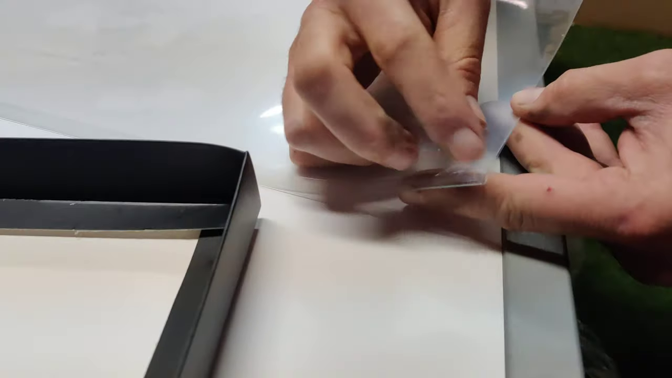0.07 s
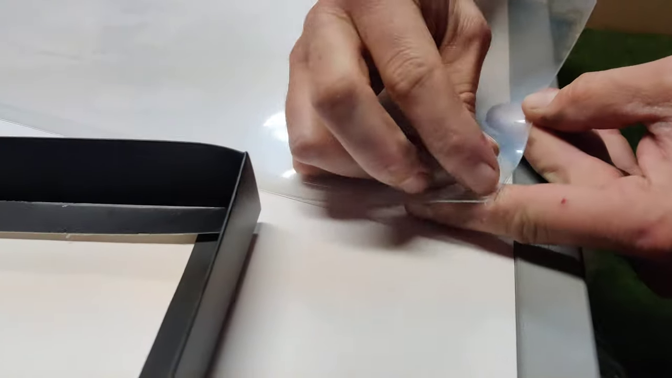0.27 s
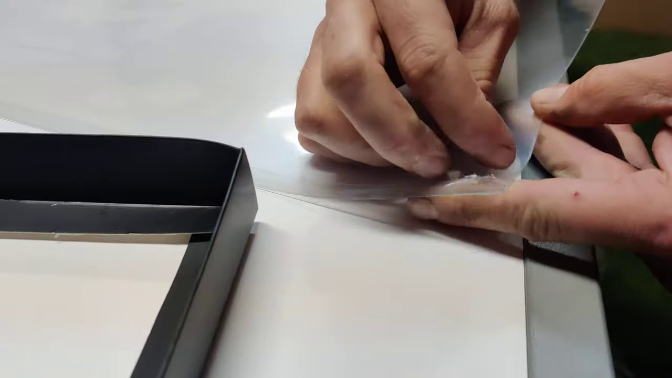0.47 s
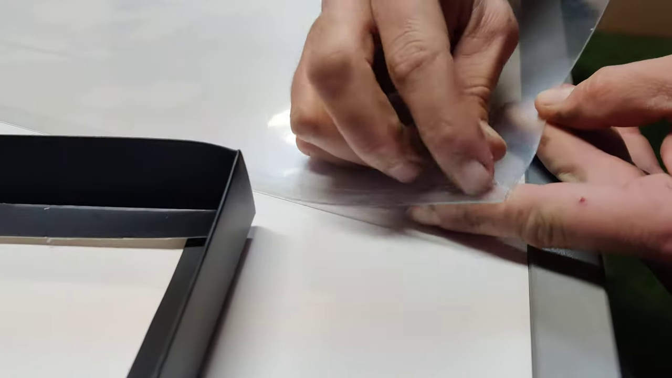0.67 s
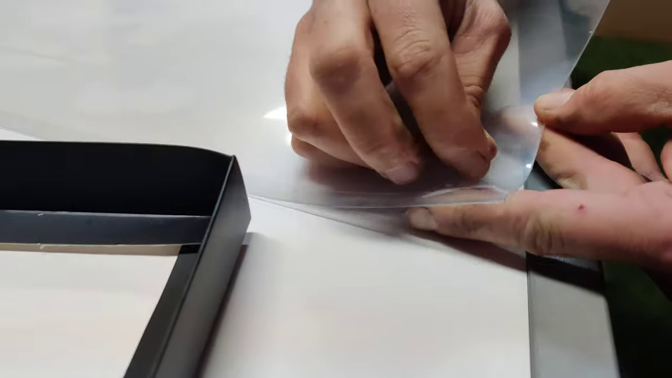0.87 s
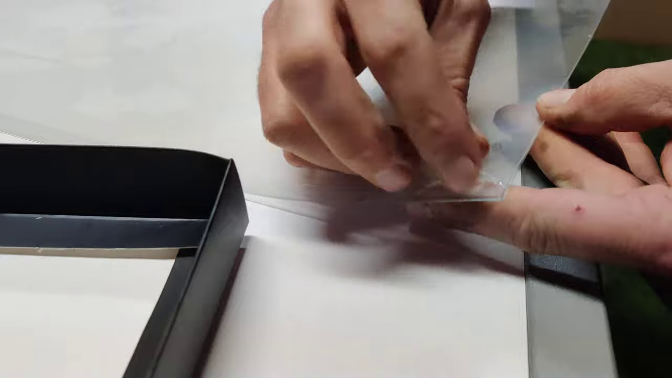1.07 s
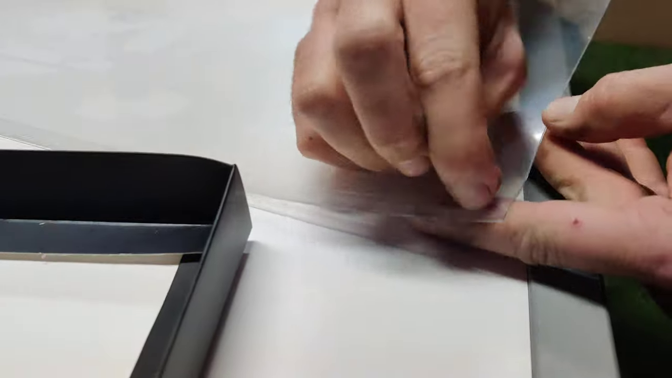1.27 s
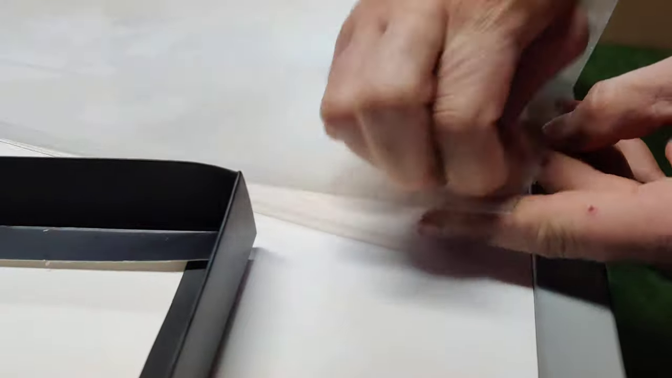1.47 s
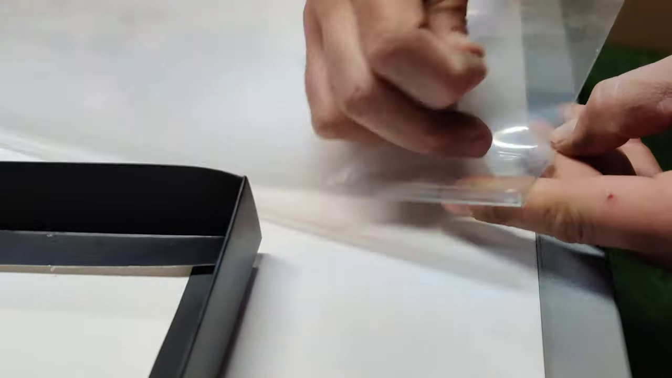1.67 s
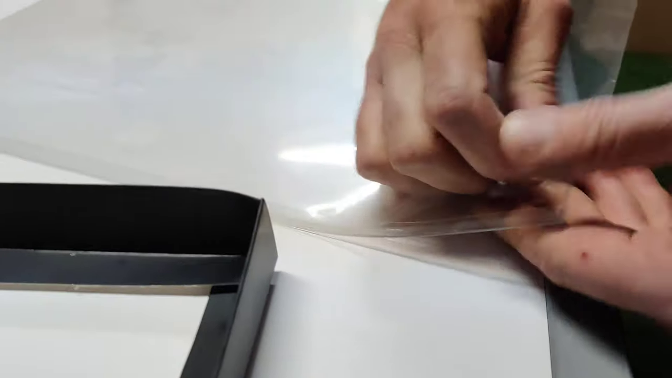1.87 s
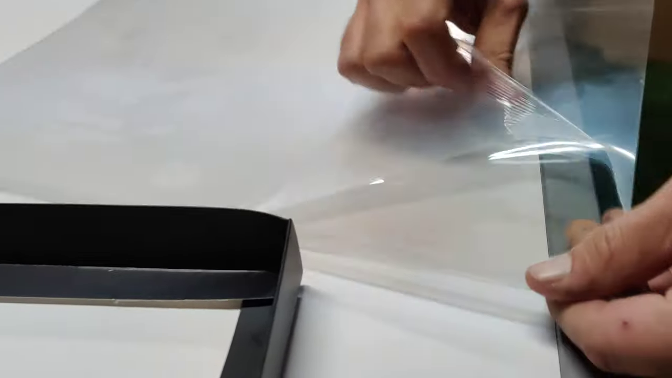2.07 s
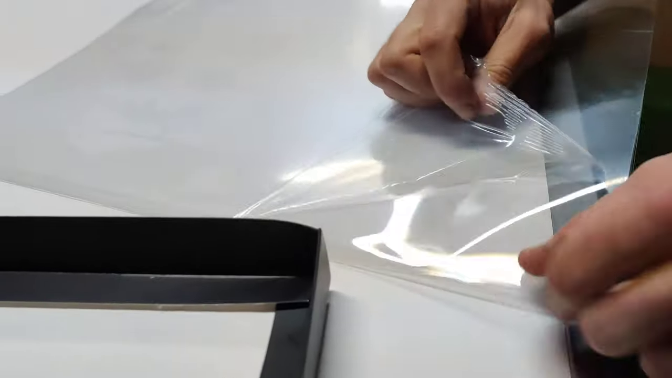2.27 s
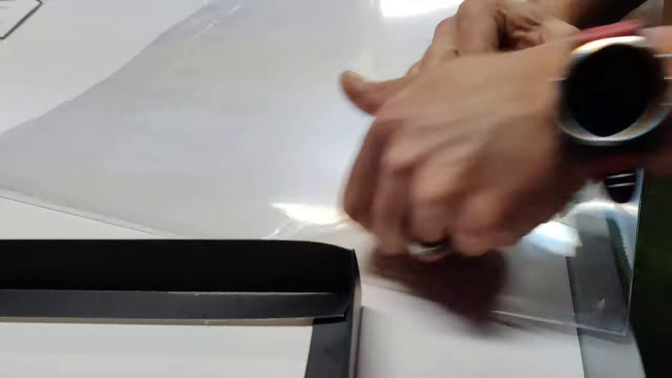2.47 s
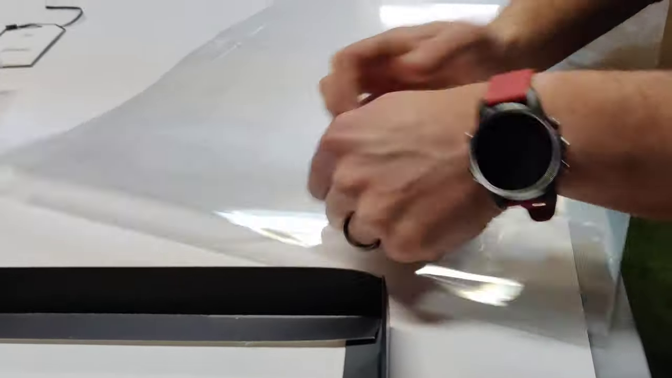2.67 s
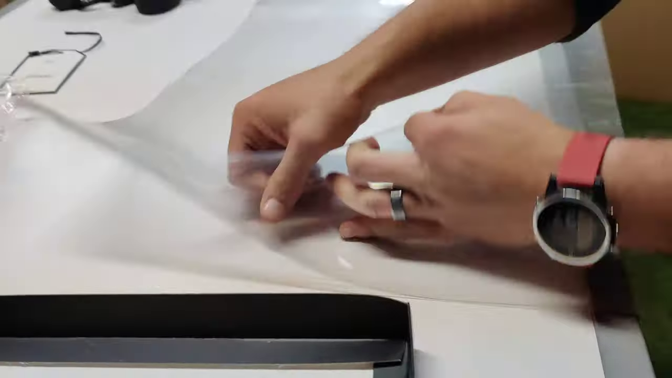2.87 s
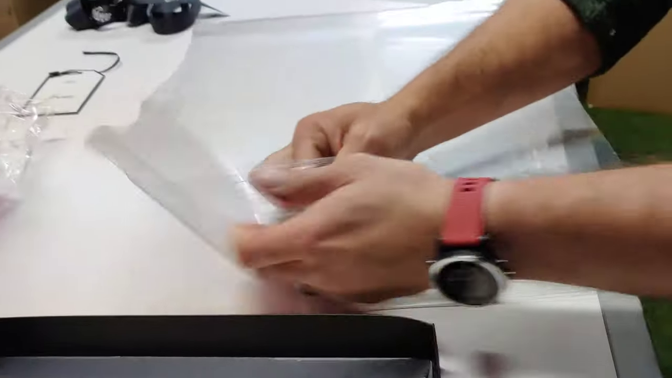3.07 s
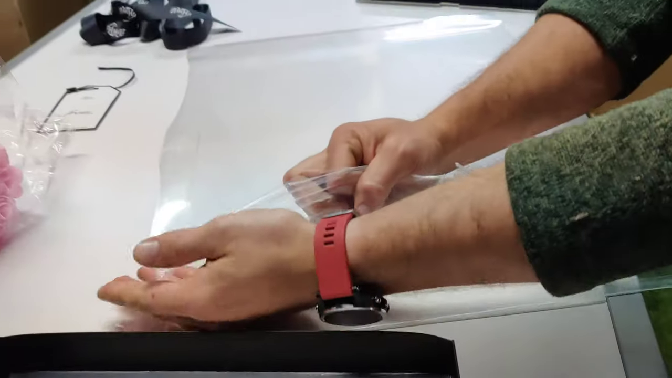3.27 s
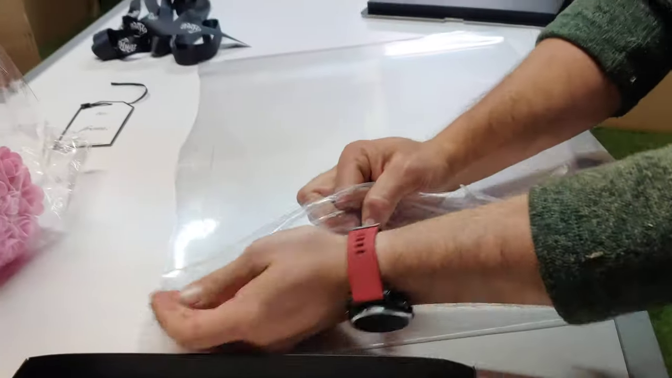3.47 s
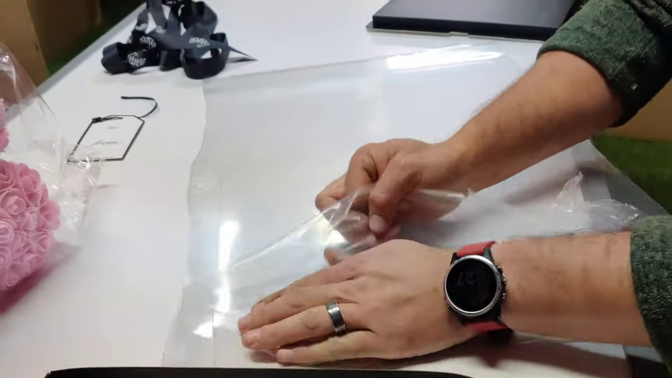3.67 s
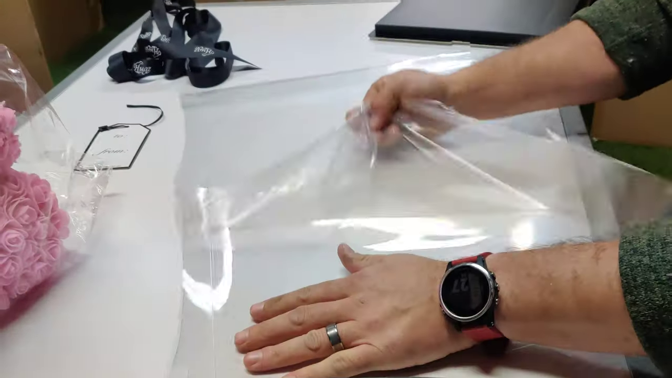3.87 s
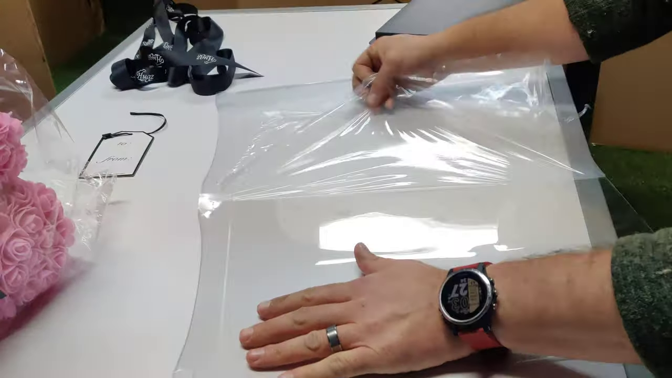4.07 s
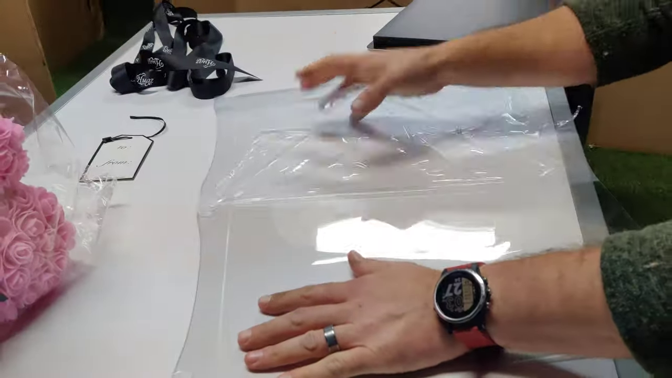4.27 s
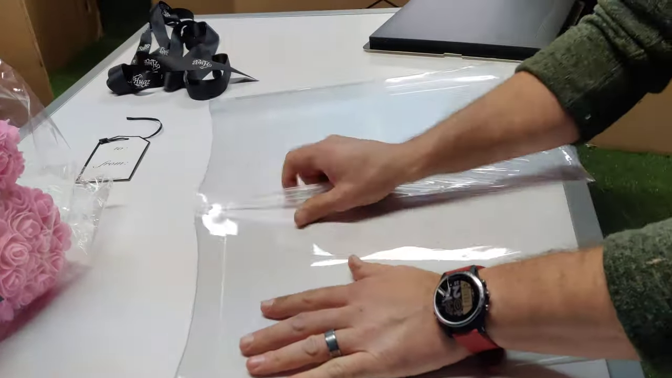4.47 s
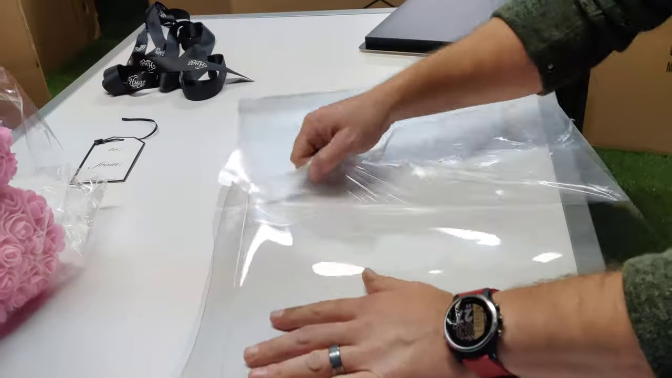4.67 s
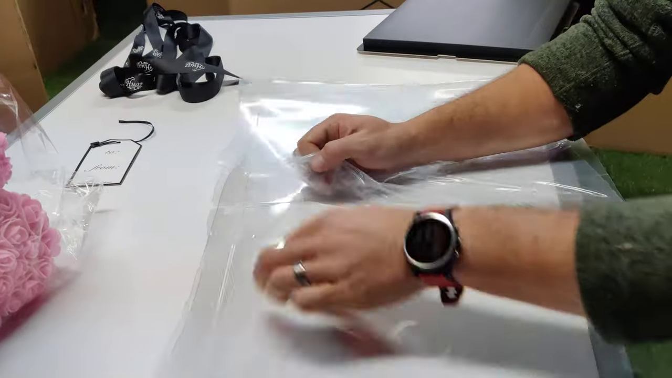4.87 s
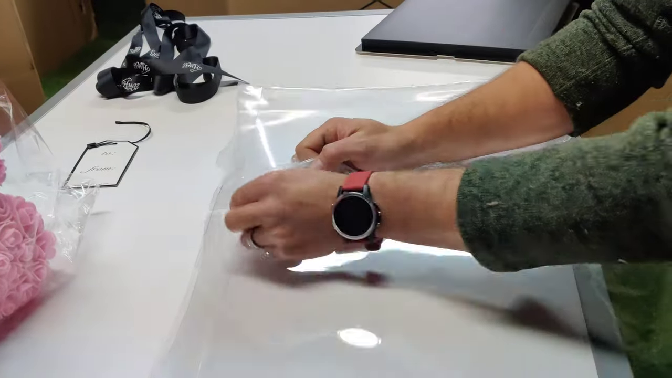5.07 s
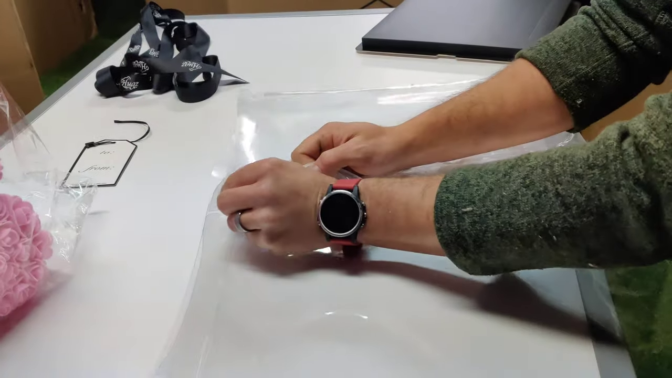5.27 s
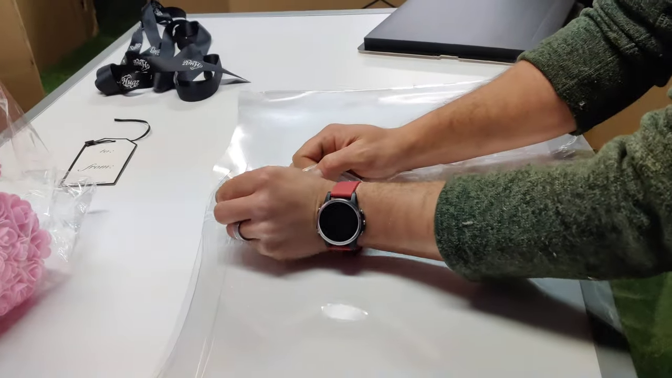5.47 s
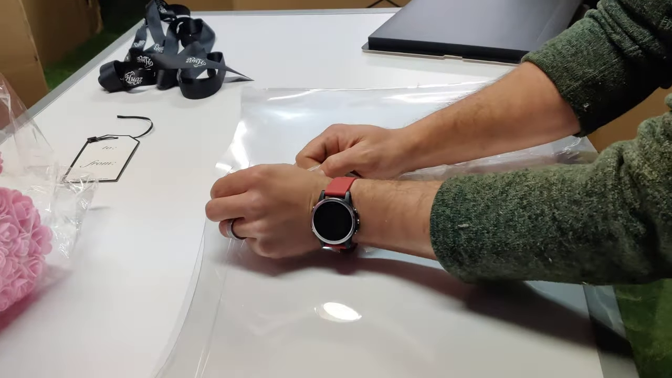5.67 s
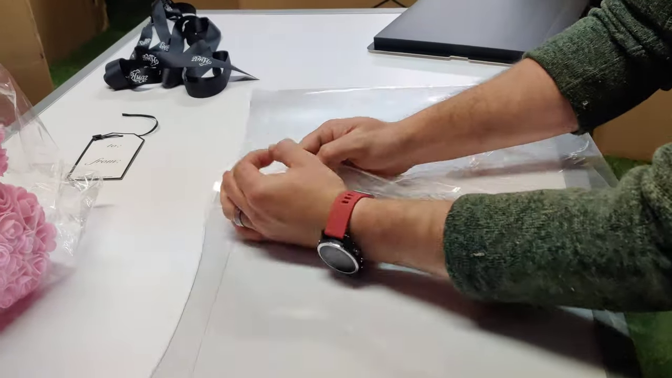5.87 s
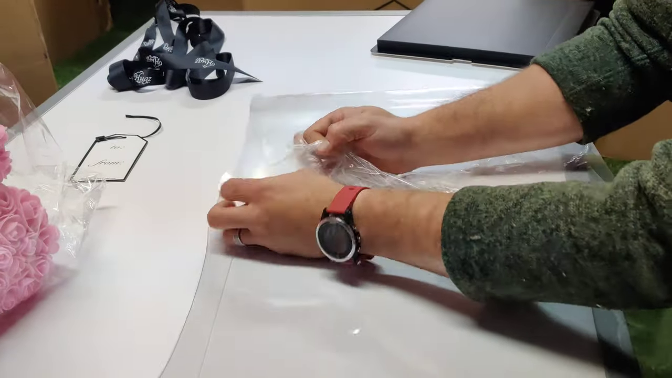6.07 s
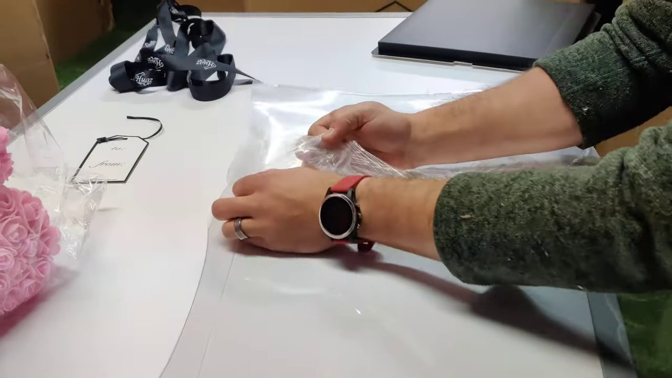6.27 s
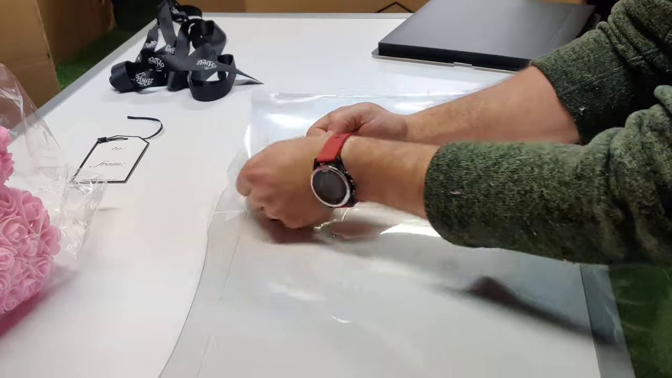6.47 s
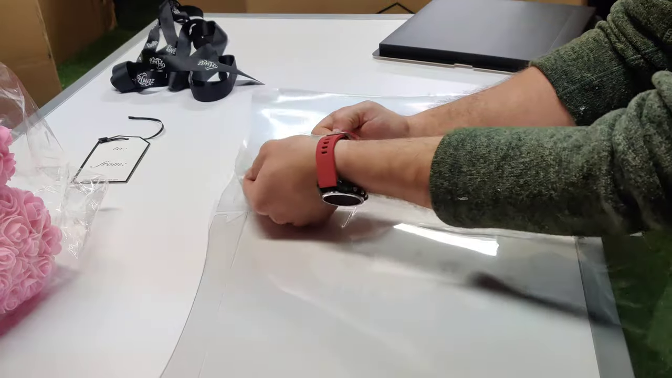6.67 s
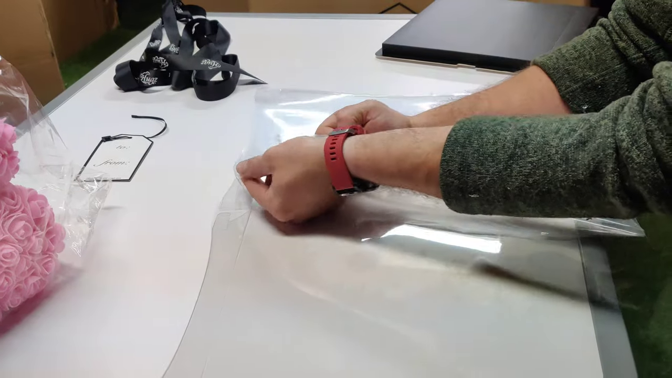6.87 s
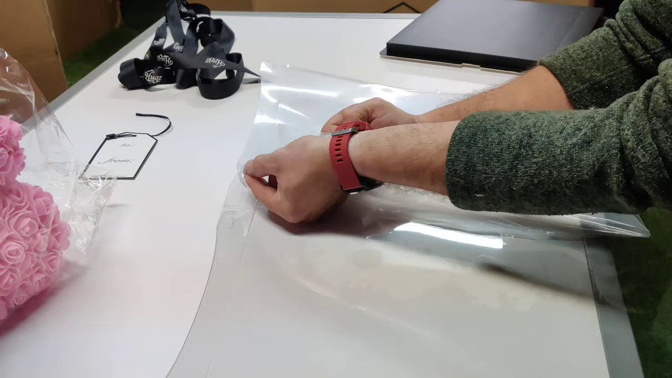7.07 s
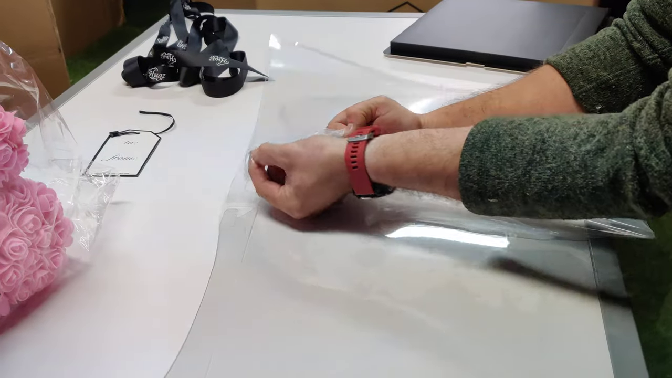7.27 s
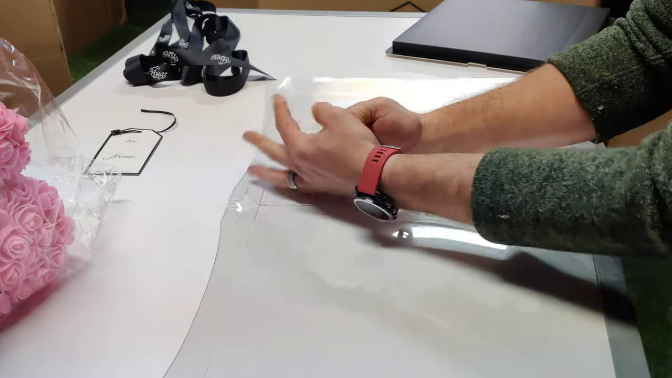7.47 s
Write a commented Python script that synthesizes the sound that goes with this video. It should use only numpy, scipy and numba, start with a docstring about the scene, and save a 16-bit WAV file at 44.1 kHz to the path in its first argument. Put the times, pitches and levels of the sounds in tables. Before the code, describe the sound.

Fingernails pick faintly at thin plastic film, then it peels away in loud jerky crackles and twangs, followed by rustling, patting and a brief squeak.

```python
"""Protective film is peeled in jerks off a clear plastic panel, after fingernails pick at its corner.
Tiny slips of the glue crackle and drum on the taut film: bursts of noise through film and panel filters.
Loose film rustles, pats and snaps (shaped noise) and squeaks (rough tones); taut film twangs and the
panel thuds once (sinking partials). A hand bumps the table and air puffs reach the microphones: two,
close by, the room's return far weaker. Behind it lie faint room noise and a low machine hum."""
import sys
import numpy as np
from scipy import signal
from scipy.fft import rfft, irfft
from scipy.io import wavfile
from scipy.ndimage import uniform_filter1d, map_coordinates
from numba import njit

SR = 44100
rng = np.random.default_rng(int(sys.argv[2]) if len(sys.argv) > 2 else 0)


def write(x):
    x = np.atleast_2d(x).T
    wavfile.write(sys.argv[1], SR, np.round(np.clip(x, -1, 1) * 32767).astype(np.int16))


N = 330750

# jerks of peeling: start_s, length_s, crack_db, drumming_db (re crack), sizzle_db (re crack), attack_s,
# slip_rate_per_s, unevenness of slip spacing (0-1), lifted_edge_hz, lifted_edge_db (re crack)
PEEL_JERKS = [(1.562, 0.079, -40.5, -1.5, 3, 0.008, 565, 0.75, 5250, -2),
              (1.66, 0.027, -27.5, -10.5, 3, 0.0071, 960, 0.55, 4700, -1),
              (1.726, 0.041, -28, -13.5, -2, 0.0087, 600, 0.79, 5600, -5),
              (1.838, .033, -32, -33, -0.5, 0.0076, 354, 0.68, 4740, -22),
              (2.043, 0.045, -23, -16, -2, 0.0076, 384, 0.86, 4400, -6),
              (2.103, 0.072, -24.5, -10, -3, 0.0085, 990, 0.16, 6200, -19),
              (2.259, 0.023, -19, -24, -3, 0.007, 440, 0.36, 4830, -2.5),
              (2.317, 0.036, -20.5, -25, -6.5, 0.00069, 1350, 0.6, 6040, -28),
              (2.459, 0.035, -19, -14, -7, 0.0066, 463, 0.24, 4440, 0.5),
              (2.532, 0.0284, -23, -4, -6.5, 0.0056, 284, 0.16, 4510, -2),
              (2.624, 0.023, -25, -12, -12, 0.0036, 206, .2, 5860, -10),
              (2.708, 0.0073, -28.5, 2.5, -3.5, 0.0039, 566, 0.44, 3345, -12),
              (2.758, 0.041, -21, 3.5, -3, 0.014, 700, 0.8, 5500, -9),
              (2.813, 0.049, -27, 10.5, -7.5, 0.014, 710, 0.85, 6030, -17),
              (2.883, 0.033, -24, -10, 0.5, 0.03, 730, 0.5, 6200, -5),
              (2.938, 0.032, -30.5, -8, -2, 0.012, 600, 0.6, 5470, -7),
              (3.014, .012, -31.5, 1, 10.5, 0.0084, 610, 0.82, 10700, -6),
              (3.051, 0.085, -23.5, 2.5, -6.5, 0.024, 535, 0.7, 5300, -13),
              (3.146, 0.059, -25.5, -6.5, -11, 0.0076, 424, 0.92, 7606, 0),
              (3.238, 0.0803, -38, 5.5, -7, 0.029, 400, 0.8, 3930, 0),
              (3.47, 0.082, -37, 0.5, -4, 0.0055, 291, 0.87, 1595, -4),
              (3.565, 0.04, -27, -15, -7, 0.011, 394, 0.76, 1580, -1),
              (3.801, 0.034, -22.5, 7.5, -5, 0.019, 614, 0.7, 3400, -4),
              (3.852, 0.17, -24, 2.5, -5, 0.0078, 650, 0.8, 3200, -3),
              (4.018, 0.093, -28, -4.5, -4, .013, 540, 0.64, 3220, -7),
              (6.59, 0.05, -35, -2, -6, 0.028, 313, 0.92, 6020, -10),
              (6.659, 0.032, -19, -14, -3, 0.0059, 600, 0.9, 7550, 1),
              (7.317, 0.043, -22.5, -13, -9, 0.008, 520, 0.37, 6450, -12),
              (7.389, 0.08, -20.5, 2, -4.5, 0.011, 700, 0.67, 2920, -6)]
# sweeps of the loose film: peak_s, half_width_s, crack_db, drumming_db (re crack), sizzle_db (re crack)
RUSTLE_SWEEPS = [(.03, 0.18, -48.5, -3, -6), (1.245, 0.0098, -47, -12, 16), (1.28, 0.027, -50.5, -5, 6),
                 (1.47, 0.21, -53.5, -34, 4), (1.9, 0.43, -47.5, -3.5, -1), (3.34, 0.11, -42.5, -0.5, -11),
                 (4.195, 0.022, -29.5, -24, 2.5), (4.45, 0.11, -40, -3.5, 6), (4.62, 0.1, -23, -16, 1),
                 (4.725, 0.1, -24, -13, 0), (4.95, 0.25, -43, -5, 0), (5.13, 0.086, -46, -1, -13),
                 (5.6, 0.6, -45.5, -6.5, -3), (5.925, 0.036, -28, -4.5, -6), (6.08, 0.058, -26.5, -3.5, 0),
                 (6.25, 0.13, -32.5, -3.5, -1), (6.385, 0.039, -41.5, 8.5, 5.5),
                 (6.71, 0.051, -30, -4.5, -7), (6.82, 0.038, -27.5, -4.5, 1.5),
                 (6.92, 0.05, -23.5, -13, 0.5), (6.985, 0.052, -24.5, -28, 2.5),
                 (7.145, 0.056, -27.5, -12.5, -1.5), (7.215, 0.031, -27.5, -10, 0)]
# slack sheet patting the panel: start_s, level_db
FILM_PATS = [(3.306, -29.5), (5.154, -29.5), (6.002, -32), (6.036, -26.5), (6.188, -27), (6.329, -27.5),
             (6.36, -30.5), (6.379, -23), (6.586, -28), (6.607, -26.5), (6.632, -26.5), (6.727, -32),
             (6.79, -24), (7.134, -33), (7.168, -28), (7.192, -28), (7.213, -31), (7.236, -21.5)]
# nail picks and snapping creases: start_s, crack_db, drumming_db (re crack), sizzle_db (re crack),
# left_minus_right_db, crease_hz
CREASE_SNAPS = [(.010, -37.5, -13, 2.5, -3, 4500), (0.045, -35, -23, 1, -6, 4300),
                (0.0647, -30.5, -21, 1, 0, 6460), (.142, -42.5, -20, 6, -7, 5900),
                (.149, -38, -28, 1, 1, 7300), (.247, -43.5, -10, -4, -4, 6550),
                (.388, -40, -8, 10, -2, 6830), (.425, -42, -1.5, -4, -9, 2780),
                (0.6398, -43.5, -33, 6.5, -5, 4930), (0.8806, -29, -14.5, 2.5, -9, 6350),
                (0.928, -48.5, -27, 10, -15, 12600), (1.0282, -30.5, -13.5, -10, -3, 5180),
                (1.1002, -44, -35, 2, -5, 5900), (1.4307, -38, -13, 7, -1, 4600),
                (1.5288, -38, -32, 15.5, -12, 8600), (1.5388, -30.5, -35, 7.5, -4, 4600),
                (1.6569, -23.5, -6, -12, -1, 4900), (1.8387, -29, 1.5, -6, 7, 4800),
                (1.982, -33.5, -12, -5, -4, 6250), (1.9996, -18, -12.5, -15, -12, 3500),
                (2.045, -21.5, -16, -18, -12, 4000), (2.2565, -19.5, -36, -2, 7, 3730),
                (2.502, -23, -8, -20, -7, 5943), (2.5254, -28.5, -3.5, -9, -5, 4648),
                (2.583, -19.5, -14, -5, -6, 4650), (2.5944, -20.5, -2, -4, 12, 2147),
                (2.6136, -17, -10, -5, 1, 5990), (2.6299, -20.5, -4, 3, 16, 4710),
                (2.6353, -17.5, -6, 1, -8, 6024), (2.6465, -22, -7, -6, 9, 6000),
                (2.918, -24.5, -1.5, -4, -4, 4030), (3.1605, -21.5, -23, -4.5, -14, 7715),
                (3.1705, -23.5, -21, -5, 0, 3700), (3.183, -29, -15, -8, -2, 5320),
                (3.2224, -18, -37, -10, 2, 6350), (3.2737, -25.5, 0.5, -5, 7, 4483),
                (3.5602, -21, -22, -6, -7, 6765), (3.5842, -19, -28, -6, -6, 5230),
                (3.603, -19.5, -24, -5, -9, 6430), (3.6318, -24, -15, -7, -1, 2130),
                (3.7159, -24.5, -10, -11, -3, 2820), (3.721, -26, -9, -4, -4, 2847),
                (3.844, -20.5, -7, -7, 7, 3450), (4.0731, -21.5, -17, -5, 12, 3266),
                (4.1331, -34.5, -29, 2, 7, 2525), (4.207, -24, -26, -1, -4.5, 4770),
                (4.229, -29.5, -25, -10, -6, 5340), (4.6285, -31, -16, 1, -4, 6380),
                (4.6985, -24.5, -7, 4, 1, 3350), (4.7789, -28.5, -24, -17, -4, 3650),
                (4.802, -25, -14, -13, -1, 3240), (4.9274, -34.5, -5, 3, 9, 2600),
                (5.1379, -34, -23, -8, 2, 5400), (5.2686, -34, -7, -17, 0, 3400),
                (5.3284, -34, 0, -3, -1, 5100), (5.3931, -32, -2.5, -1.5, -2.5, 5370),
                (5.4457, -28.5, -4, -8, -3, 3600), (5.4557, -32.5, 0, -8, -6, 2430),
                (5.4952, -35.5, 0, -11, 1, 3830), (5.5287, -37, -7, 4, -2, 5440),
                (5.5864, -37.5, -6, -3, -3, 5640), (5.7055, -36.5, -9, -14, -7, 5430),
                (5.87, -33, 2, -3, -1, 3270), (5.9107, -17, -6.5, -7.5, -5, 4660),
                (6.1527, -16, -11, -9, 1.5, 5650), (6.261, -27, -5, -12, 0, 4030),
                (6.2909, -25.5, -1, -7, -6, 3700), (6.893, -17.5, -13.5, -18, -3, 4850),
                (7.0392, -27, -11, -3, -5, 6500), (7.0885, -27, -28, 3, 2, 6550),
                (7.1011, -25, -1, 3, -3, 4200), (7.1406, -28, -7, 7, -23, 7900),
                (7.252, -22.5, -12, -12, -1, 6580), (7.2805, -21, -14, -8, -6, 7570),
                (7.2926, -16.5, -18, -3, -4, 10210), (7.2973, -18, -30, -3, -2, 6400),
                (7.321, -18.5, -26, -3, -5, 6350)]
# twangs of the taut film, and at 3.277 s a low thud on the panel: start_s, length_s, first_hz, level_db,
# sag_octaves_per_s, overtones_db, waver (share of the pitch)
TWANGS_AND_THUD = [(1.033, 0.015, 1540, -40, 2.8, -4, 0.018), (1.674, 0.037, 1116, -30.5, 7.4, 4, 0.12),
                   (2.001, 0.0049, 1570, -14, 7, -3, 0.066), (2.034, 0.044, 1314, -27.5, 13.7, 9, 0.088),
                   (2.064, 0.059, 752, -26.5, 10.7, 3, 0.05), (2.108, 0.057, 1600, -27, 13.2, 12, 0.036),
                   (2.125, 0.069, 634, -34.5, 12, 12, 0.067), (2.162, 0.037, 1597, -29.5, 2.2, 6, 0.022),
                   (2.178, 0.023, 1200, -27.5, 8.6, 7, .03), (2.71, 0.011, 1170, -27, 14, -6, 0.062),
                   (2.737, 0.061, 604.5, -17, 1.86, 3.5, .18), (2.779, 0.011, 1580, -21, 6.7, 9, 0.045),
                   (2.841, 0.014, 970, -11.5, 17.5, 3, 0.095), (2.856, 0.043, 799, -20, 8.8, 4.5, 0.077),
                   (3.048, 0.044, 775.5, -19, 5, 0, 0.1), (3.081, 0.06, 686, -22, 7.2, -3, 0.22),
                   (3.177, 0.075, 1128, -36.5, 20, 0, 0.054), (3.277, 0.04, 189, -32.5, 0.49, -2, 0.04),
                   (3.813, 0.027, 980.5, -12, 6.5, -2, 0.054), (3.809, 0.13, 653.2, -22.5, 1.58, 6, 0.19),
                   (3.93, 0.09, 610.8, -22.5, 1.04, 11, .19), (4.047, 0.051, 440.2, -32, 15.5, 6, .16),
                   (4.708, 0.048, 858, -32.5, 9, 11, 0.14), (6.286, 0.02, 680, -24.5, 12, 7, 0.17),
                   (6.64, 0.022, 868, -24.5, 17, -4, 0.082), (7.432, 0.012, 695.4, -18.5, 10, 4, .12)]
# squeaks of film dragged over the panel, one list each: time_s, pitch_hz, level_db, roughness (0-1)
DRAG_SQUEAKS = [
    [(6.427, 14460, -26, 0.1), (6.433, 11650, -16, 0.33), (6.437, 6850, -19, 0.3),
     (6.457, 6750, -13.5, 0.22), (6.468, 7300, -17, 0.64), (6.485, 6760, -24, 1), (6.525, 6680, -32, 0.66)],
    [(6.532, 3150, -21, 0.88), (6.552, 3650, -23.5, 0.6)],
    [(6.553, 5330, -17, 0.45), (6.559, 5330, -21, 0.5), (6.566, 6600, -23, 0.7), (6.571, 5500, -23, 0.88),
     (6.595, 5200, -31, 0.6)],
]
# hand on the table: start_s, level_db
HAND_BUMPS = [(4.518, -20), (4.539, -20.5), (4.583, -24.5), (5.112, -33)]
# air pushed at the microphones by the sheet and the arms: peak_s, width_s, level_db
AIR_PUFFS = [(4.95, 0.064, -28.5), (6.039, 0.065, -28)]
# machine hum: pitch_hz, level_db
HUM_TONES = [(67.2, -47), (134.3, -52), (241, -62.5), (596, -66)]

# colours of peeling, rustling and room noise: frequency_hz, level_db (per Hz, relative)
PEEL_SPECTRUM = [(120, 4), (200, -3), (448, -10), (659, 1.5), (933, -3), (1270, -2), (1530, -7),
                 (1740, -9.5), (1910, -10.5), (2170, -8), (3250, -6.5), (6170, -2.5), (9060, -5),
                 (13600, -2), (16000, -2.5)]
RUSTLE_SPECTRUM = [(120, -50), (200, -1), (387, -6.5), (722, 0), (821, -10), (1250, -2), (1870, -6),
                   (2170, -2.5), (3250, 0), (7010, 3), (8900, -11), (13800, -5.5), (16000, -6.5)]
ROOM_SPECTRUM = [(16, 9.5), (28, 7.5), (45, -2.5), (60, -1.5), (85, -7.5), (190, -9), (249, -17),
                 (427, -24), (640, -29), (840, -25), (1290, -31), (3820, -33), (6740, -34.5), (8830, -46),
                 (14000, -42), (16000, -41)]
# wrinkles that ring and retune as the film flexes: centre_hz
WRINKLE_CENTRES = [1567, 2810, 3624, 4600, 6160]
# modes of the taut film, lent to the thud too: multiple of the lowest (ratio), level_db (relative)
MEMBRANE_MODES = [(0.998, 3), (1.33, -16.5), (1.82, -21), (2.36, -19.5), (2.951, -16)]
# resonances and notches of the panel under the film: centre_hz, width_hz, gain_db (below 0 is a notch)
PANEL_PEAKS_AND_NOTCHES = [(520, 39, 3), (660, 980, 2), (970, 260, 7.5), (1280, 35, -19), (1465, 130, 5),
                           (1742, 16.5, -26), (1901, 205, 9.5), (2090, 970, -5), (4830, 530, 1)]
# the stiff panel's ring after a snap: pitch_hz, level_db (relative), t60_s
PANEL_MODES = [(660, -31, 0.065), (980, -26, 0.069), (1414, -15, 0.13), (1612, -9.5, 0.074),
               (1830, -57, 0.062)]
# table-top modes: pitch_hz, level_db (relative), t60_s
TABLE_MODES = [(117.6, 1, 0.23), (166, 6, 0.12), (204, -7, 0.08), (235, -1, 0.052), (305, -8, 0.27)]

ROOM_DB = -45
TOP_HZ = 15900
T = np.arange(N) / SR
FREQ = np.maximum(np.arange(N // 2 + 1) * SR / N, 1)
# borders between drumming, clatter, crack and sizzle
BODY_HZ, CLATTER_HZ, SIZZLE_HZ = 1450, 3700, 8000
# ring of a slip; share of smooth hiss under the slips of peeling and of rustling
SLIP_RING_S, PEEL_HISS, RUSTLE_HISS = 0.0007, 0.3, 0.65
# a jerk eases while it holds, stops, and leaves the sheet crackling faintly
EASE_DB_PER_S, RELEASE_S = 13, 0.0091
SETTLE_DB, SETTLE_S = -21.5, 0.029
# a slack sheet drums; its clatter rises by this many dB for each dB of drumming
CLATTER_PER_DRUM = 0.33
# shape of a sweep: 1 is a peak, 2 a bell
SWEEP_ROUNDNESS = 1.26


def peeling(first_lag_s=0.00088, last_lag_s=0.0019, lead_s=0.01, edge_width_hz=700.0):
    """The glue lets go in slips that ring the lifted edge; through each pull the freed stretch grows longer."""
    starts = np.array(PEEL_JERKS)[:, 0]
    current = np.maximum(np.searchsorted(starts - lead_s, T) - 1, 0)
    s, length, *_, rate, uneven, edge_hz, edge_db = np.transpose(PEEL_JERKS)[:, current]
    pulses = slips(rate, uneven, scatter_db=1.8, clump_db=1.3)
    freed = np.clip((T - s + lead_s) / (length + 2 * lead_s + RELEASE_S), 0, 1)
    lag_s = first_lag_s + (last_lag_s - first_lag_s) * freed
    gains = range_gains(PEEL_JERKS, jerk)
    # an even pull keeps the freed stretch flat, so waves bounce in it more than once
    crackle = bursts(pulses, SLIP_RING_S, PEEL_HISS)
    bounced = mirrored(crackle, lag_s, second_bounce=np.clip(1 - uneven, 0, 1))
    sheet = radiate(wrinkled(bounced), gains, PEEL_SPECTRUM, range_db=(-7, -2.5, -1, 0), pan_db=-5)
    moving_edge_hz = edge_hz * np.exp(0.026 * walk(200))
    # the tiny offset keeps the resonator clear of vanishingly small numbers
    edge = unit(resonate(pulses + 1e-18, moving_edge_hz, edge_width_hz))
    return sheet + edge * gains[2] * amp(edge_db) * pan(-2)


def rustling(buckle_rate=55.0, buckle_db=-12):
    """Loose film slides with a swish of dense little cracks, and now and then a fold buckles softly."""
    always_uneven = np.ones(N)
    cracks = slips(np.full(N, 900.0), always_uneven, scatter_db=5, clump_db=1.5)
    sliding = bursts(cracks, SLIP_RING_S, RUSTLE_HISS)
    fits = amp(walk(50))
    buckles = slips(np.full(N, buckle_rate), always_uneven, scatter_db=5, clump_db=0)
    buckling = bursts(buckles, ring_s=0.0012, hiss=0)
    lag_s = 0.0012 * np.exp(0.1844 * walk(6))
    source = mirrored(fits * sliding + amp(buckle_db) * buckling, lag_s, second_bounce=0)
    gains = range_gains(RUSTLE_SWEEPS, sweep)
    return radiate(source, gains, RUSTLE_SPECTRUM, range_db=(0, 0, 0, 0), pan_db=-6)


def flaps(rise_s=0.0013, fall_s=0.0048, clatter_db=-1, crack_db=-7):
    """Slack film lands on the panel: a dull, papery pat with a soft onset."""
    t = T[:SR // 20]
    shape = (1 - np.exp(-t / rise_s)) * np.exp(-t / fall_s)
    shape /= shape.max()
    pats = np.zeros((2, N))
    for s, db in FILM_PATS:
        start = int(s * SR)
        pats[:, start:start + len(t)] += amp(db) * shape * rng.standard_normal((2, len(t)))
    drumming, clatter, crack, _ = film_ranges(RUSTLE_SPECTRUM)
    response = drumming + amp(clatter_db) * clatter + amp(crack_db) * crack
    return irfft(two_ports(pats) * response, N)


def snaps(click_db=13, crack_s=0.0019, tail_s=0.026, tail_db=-21, crease_db=6, crease_s=0.0024,
          range_db=(0, -3, -2.5, -0.5)):
    """A crease flips or a nail slips: a click, a sharp crack, the crease's note and a short panel ring."""
    t = T[:SR // 16]
    ring = modal_ring(PANEL_MODES, t)
    tracks, notes = np.zeros((4, 2, N + len(t))), np.zeros((2, N + len(t)))
    for s, db, body, sizzle, pan_db, crease_hz in CREASE_SNAPS:
        start = int(s * SR)
        now = slice(start, start + len(t))
        # weak creases flip faster than strong ones
        decay_s = crack_s * amp(db + 25.5) ** 0.22
        shape = np.exp(-t / decay_s) + amp(tail_db) * np.exp(-t / tail_s)
        shape /= np.sqrt(np.mean(shape[t < 0.006] ** 2))
        gains = amp(db + np.array([body, 0, 0, sizzle]) + range_db)
        crack = after_ticks(shape, tick_db=-17) * rng.standard_normal((2, len(t)))
        crack += amp(click_db) * (t == 0)
        tracks[:, :, now] += gains[:, None, None] * crack * pan(pan_db)
        crease = np.exp(-t / crease_s) * np.sin(2 * np.pi * crease_hz * t)
        # a snap that drums the sheet also shakes the panel harder
        notes[:, now] += amp(db + crease_db) * crease * pan(pan_db) + amp(db + body / 2) * ring
    spectrum = sum(two_ports(x[:, :N]) * h for x, h in zip(tracks, film_ranges(PEEL_SPECTRUM)))
    return notes[:, :N] + irfft(spectrum, N)


def twangs_and_thud(rise_share=0.069, flutter_db=3):
    """Taut film rings like a drumhead, its pitch sinking as more comes free; one low thud is made alike."""
    out, wobble, flutter = np.zeros(N), walk(700), amp(flutter_db * walk(300))
    for s, length, first_hz, db, sag, overtones_db, waver in TWANGS_AND_THUD:
        now = (T >= s) & (T < s + 2 * length)
        t = T[now] - s
        hz = first_hz * 2 ** (-sag * t) * (1 + waver * wobble[now])
        phase = 2 * np.pi * np.cumsum(hz) / SR
        rise = 1 - np.exp(-t / (rise_share * length))
        swell = rise * np.exp(-t / length / 2 - (t / length) ** 4)
        # overtones_db spares the lowest mode
        partials = sum(amp(g + overtones_db * (i > 0)) * np.sin(k * phase)
                       for i, (k, g) in enumerate(MEMBRANE_MODES))
        out[now] += amp(db) * swell * flutter[now] * partials
    return out * pan(3.7)


def smear(width_hz):
    """Complex noise above 0 Hz whose power falls by a factor of e per width: it smears a tone upwards."""
    spectrum = rfft(rng.standard_normal((2, N))) * np.exp(-np.minimum(FREQ / width_hz / 2, 20))
    return unit(np.fft.ifft(spectrum, N))


def squeaks(octave_db=-4, whistle_hz=260, rasp_hz=1500, grit_db=-12):
    """Very fast stick-slip with its octave; early slips smear the whistle upwards into a rasp and add grit."""
    out, whistle, rasp = 0, smear(whistle_hz), smear(rasp_hz)
    for rows in DRAG_SQUEAKS:
        hz, db, rough = curve(rows)
        rough = np.clip(rough, 0, 1)
        turn = np.exp(2j * np.pi * np.cumsum(hz) / SR)
        tone = turn * (np.sqrt(1 - rough ** 2) * whistle + rough * rasp)
        tone = tone + amp(octave_db) * (2 * hz < TOP_HZ) * turn ** 2 * rasp
        out = out + gate(rows) * amp(db) * tone.real
    pulses = slips(np.full(N, 600.0), np.ones(N), scatter_db=2, clump_db=1)
    stutter = unit(bursts(pulses, SLIP_RING_S, PEEL_HISS))
    bright_stutter = irfft(rfft(stutter) * amp(slope(CLATTER_HZ / FREQ)), N)
    # the grit follows the loudness of the squeak
    loudness = np.sqrt(np.abs(uniform_filter1d(out ** 2, size=200)))
    grit = amp(grit_db) * loudness * bright_stutter
    catching = amp(3 * walk(260) - 0.7)
    return (out * catching + grit) * pan(-5)


def bumps():
    """A soft hand sets the table top ringing in decaying modes."""
    ring = modal_ring(TABLE_MODES, T[:SR // 3])
    blows = np.zeros(N)
    for s, db in HAND_BUMPS:
        blows[int(s * SR)] += amp(db)
    return signal.fftconvolve(blows, ring / 2)[:N] * pan(2.2)


def puffs(centre_hz=19):
    """Slow eddies of air on the microphones, a few uneven swings each."""
    hz = centre_hz * np.exp(0.25 * walk(44))
    eddies = np.sin(2 * np.pi * np.cumsum(hz) / SR)
    swell = sum(amp(db) * np.exp(-((T - s) / width) ** 2) for s, width, db in AIR_PUFFS)
    return eddies * swell * pan(2.9)


def room_tone():
    """A low machine hum, its tones drifting slightly in level, over faint coloured room noise."""
    gain = amp(colour(ROOM_SPECTRUM) + slope(50 / FREQ, order=2))
    noise = unit(irfft(two_ports(rng.standard_normal((2, N))) * gain, N))
    hum = sum(np.sqrt(2) * amp(db + walk(1.56)) * np.sin(2 * np.pi * hz * T) for hz, db in HUM_TONES)
    return amp(ROOM_DB) * noise * pan(0.11) + hum * pan(3.5)


def room(x, wet_db=-16, t60_low=0.69, t60_high=0.18, split_hz=6000, delay_s=0.00075):
    """Nearby walls return a short tail, its treble dying first (t60 in s)."""
    noise = two_ports(rng.standard_normal((2, N)), alike_hz=503)
    low = amp(slope(FREQ / split_hz, order=4))
    dull = irfft(noise * low, N) * amp(-60 * T / t60_low)
    bright = irfft(noise * (1 - low), N) * amp(-60 * T / t60_high)
    # silent up to the delay, full at twice the delay
    onset = np.clip(T / delay_s - 1, 0, 1)
    tail = ((dull + 0.5 * bright) * onset)[:, :SR // 2]
    tail /= np.sqrt(np.sum(tail ** 2))
    return x + amp(wet_db) * signal.fftconvolve(x, tail, axes=1)[:, :N]


def slips(rate, uneven, scatter_db, clump_db):
    """A train of tiny releases in clumps, with local mean power evened out whatever the size of single slips."""
    chance = rng.standard_normal((N // 8, 2))
    phase = np.cumsum(rate) / SR
    turns = np.arange(1, min(int(phase[-1]), len(chance)))
    at = np.searchsorted(phase, turns)
    # each slip comes early or late by a share of the spacing
    at = np.searchsorted(phase, turns + uneven[at] * chance[turns, 0]).clip(0, N - 1)
    pulses = np.zeros(N)
    np.add.at(pulses, at, amp(scatter_db * chance[turns, 1].clip(-2, 2)))
    pulses *= amp(clump_db * walk(130))
    return pulses / np.sqrt(np.abs(uniform_filter1d(pulses ** 2, size=900)) + 1e-9)


def bursts(pulses, ring_s, hiss):
    """Each slip sends a short burst of bending waves through the film, over a smooth hiss."""
    fade = np.exp(-2 * T[:SR // 100] / ring_s)
    power = np.abs(signal.fftconvolve(pulses ** 2, fade / fade.sum())[:N])
    return np.sqrt(power + hiss ** 2) * rng.standard_normal((2, N))


def late(port, seconds):
    """One channel delayed by a time that may change."""
    return map_coordinates(port, [np.arange(N) - seconds * SR], order=1)


def mirrored(x, lag_s, second_bounce):
    """Waves bounce between the front and the hand; as that path changes, a comb of resonances slides."""
    paths = [lag_s * (1 + 0.012 * walk(19)), lag_s * (1.156 + 0.0764 * walk(14))]
    return np.array([port - late(port, lag) + second_bounce * late(port, 2 * lag)
                     + 0.26 * late(port, 0.346 * lag) for port, lag in zip(x, paths)])


def wrinkled(x, ring_db=4, q=16, wander=0.082, retune_rate=14):
    """Wrinkles pick out a few notes of the crackle, and each note wanders on its own."""
    out = x.copy()
    for centre in WRINKLE_CENTRES:
        hz = centre * np.exp(wander * walk(retune_rate))
        out += amp(ring_db) * np.array([resonate(port, hz, float(centre / q)) for port in x])
    return out


def radiate(source, gains, points, range_db, pan_db):
    """The sheet radiates its slips in four ranges, each with its own level and side."""
    spectrum = two_ports(source)
    # the tilting sheet beams its treble now to one side, now to the other
    beam_db = pan_db + 2 * walk(4.7)
    sides = [pan(0.59), pan(beam_db + 5.5), pan(beam_db), pan(beam_db)]
    return sum(amp(db) * g * side * unit(irfft(spectrum * h, N))
               for db, g, side, h in zip(range_db, gains, sides, film_ranges(points)))


def jerk(s, length, attack_s, *_):
    """Envelope of one pull: attack, a slowly easing hold, release and a faint settling tail."""
    before, after = np.maximum(s - T, 0), np.maximum(T - s - length, 0)
    hold = amp(-EASE_DB_PER_S * (np.clip(T - s, 0, length) - length / 2))
    quick = np.exp(-np.minimum(before / attack_s + after / RELEASE_S, 20))
    settling = np.exp(-np.minimum(before / (2 * attack_s) + after / SETTLE_S, 20))
    return hold * (quick + amp(SETTLE_DB) * settling)


def sweep(s, width):
    """Envelope of one move of the loose film: it swells and dies away alike."""
    return np.exp(-np.minimum(np.abs((T - s) / width) ** SWEEP_ROUNDNESS, 20))


def range_gains(moves, envelope):
    """Drumming, clatter, crack and sizzle of all moves; their powers add."""
    levels = np.array([db + np.array([drum, CLATTER_PER_DRUM * drum, 0, sizzle])
                       for _, _, db, drum, sizzle, *_ in moves])
    shapes = np.array([envelope(s, length, *rest) for s, length, _, _, _, *rest in moves])
    return np.sqrt(amp(levels.T) ** 2 @ shapes ** 2)


def film_ranges(points, lowest_hz=170):
    """Responses of film on panel in four ranges: drumming, clatter, crack, sizzle."""
    panel_db = sum(g / (1 + (2 * (FREQ - hz) / width) ** 2) for hz, width, g in PANEL_PEAKS_AND_NOTCHES)
    film = causal(colour(points) + panel_db + slope(lowest_hz / FREQ, order=4))
    borders = (BODY_HZ, CLATTER_HZ, SIZZLE_HZ, TOP_HZ)
    below = [1 / (1 + (FREQ / hz) ** (12 + 4 * k)) for k, hz in enumerate(borders)]
    return [film * band / unit_power(film * band) for band in np.diff(below, axis=0, prepend=0)]


def after_ticks(shape, tick_db, count=2, spread_s=0.023, scatter_db=3):
    """A fold that has flipped settles with a few smaller ticks."""
    power = shape ** 2
    for lateness, size in zip(rng.uniform(0.12, 1, count), rng.standard_normal(count)):
        delay = min(int(lateness * spread_s * SR), len(shape) - 1)
        power[delay:] += (amp(tick_db + scatter_db * size) * shape[:len(shape) - delay]) ** 2
    return np.sqrt(power)


def modal_ring(modes, t):
    """A struck body rings as a sum of decaying sines."""
    return sum(amp(db - 60 * t / t60) * np.sin(2 * np.pi * hz * t) for hz, db, t60 in modes)


@njit
def resonate(x, hz, width):
    """A resonance whose centre may move; gain 1 at the centre."""
    y, band, low = np.empty(len(x)), 0., 0.
    for i in range(len(x)):
        g, k = np.tan(np.pi * hz[i] / SR), width / hz[i]
        v = (band + g * (x[i] - low)) / (1 + g * (g + k))
        band, low, y[i] = 2 * v - band, low + 2 * g * v, k * v
    return y


def two_ports(x, alike_hz=1300):
    """Spectrum at two microphones: long waves reach both alike, short ones differ."""
    left, right = rfft(x)
    side = (left - right) / 2 * (FREQ / np.hypot(FREQ, alike_hz))
    return (left + right) / 2 + np.array([[1], [-1]]) * side


def off_centre(x, lag_s=0.00005):
    """The sheet's sound reaches the right microphone slightly later than the left."""
    return np.array([x[0], irfft(rfft(x[1]) * np.exp(-2j * np.pi * FREQ * lag_s), N)])


def pan(db):
    """Left and right gains for a left-minus-right level, at constant power."""
    gains = amp(np.array([db, -db]).reshape(2, -1) / 2)
    return gains / np.sqrt(np.mean(gains ** 2, axis=0))


def amp(db):
    """Decibels to gain."""
    return 10 ** (np.asarray(db) / 20)


def curve(rows):
    """The columns of a table as lines in time."""
    s, *columns = np.transpose(rows)
    return [np.interp(T, s, c) for c in columns]


def gate(rows, fade=0.004):
    """Open from the first row to the last, with soft edges outside them."""
    return np.clip(np.minimum(T - rows[0][0], rows[-1][0] - T) / fade + 1, 0, 1)


def unit(x):
    """Scaled to rms 1."""
    return x / (np.std(x) + 1e-12)


def unit_power(response):
    """Rms gain of a response for white noise."""
    return np.sqrt(np.mean(np.abs(response) ** 2))


def walk(rate):
    """Random values, this many per second, joined by lines; spread 1."""
    steps = rng.standard_normal(N // 8)
    return unit(np.interp(T * rate, np.arange(len(steps)), steps))


def colour(points):
    """A table of frequency_hz, level_db as dB on the frequency axis."""
    hz, db = np.transpose(points)
    return np.interp(np.log(FREQ), np.log(hz), db)


def causal(db):
    """The minimum-phase response with this gain: it rings after a click, never before."""
    cepstrum = irfft(db * np.log(10) / 20, N)
    cepstrum[1:N // 2] *= 2
    cepstrum[N // 2 + 1:] = 0
    return np.exp(rfft(cepstrum))


def slope(ratio, order=8):
    """Gain in dB of a filter edge, falling where the frequency ratio passes 1."""
    return -10 * np.log10(1 + ratio ** order)


def scene():
    """Film, panel and table in the room; puffs and room tone reach the microphones directly."""
    film = peeling() + rustling() + snaps() + flaps() + squeaks()
    return room(off_centre(film) + twangs_and_thud() + bumps()) + puffs() + room_tone()


def record(dry):
    """The recorder rounds the tallest peaks and cuts the top."""
    top_cut = signal.ellip(10, 0.2, 80, TOP_HZ, fs=SR, output="sos")
    return signal.sosfilt(top_cut, np.tanh(dry))


dry = scene()
out = record(dry)
write(out)
```